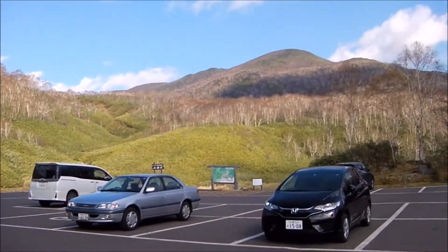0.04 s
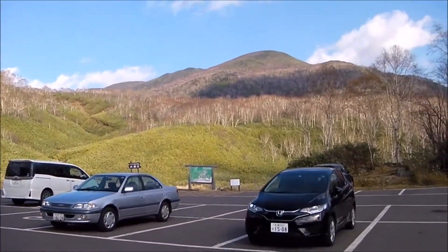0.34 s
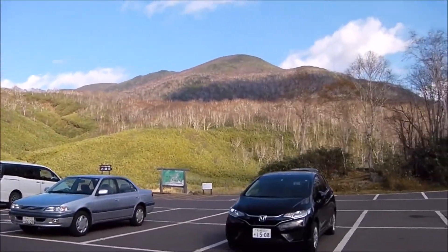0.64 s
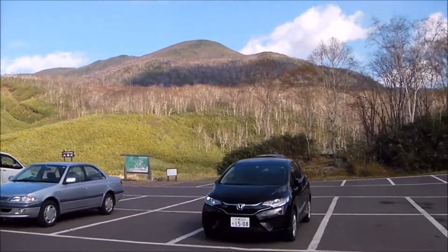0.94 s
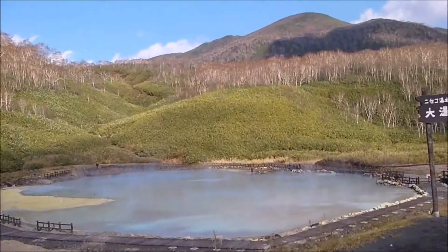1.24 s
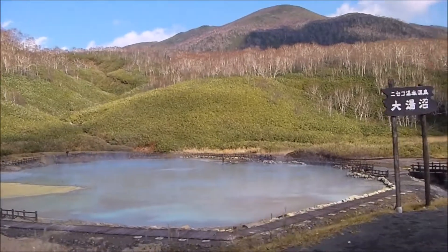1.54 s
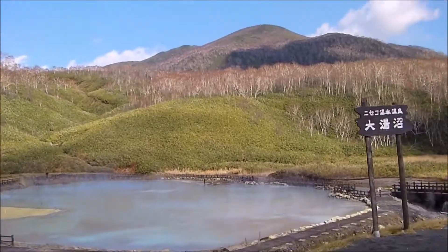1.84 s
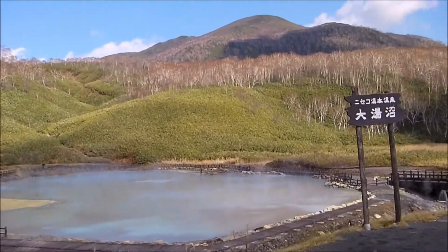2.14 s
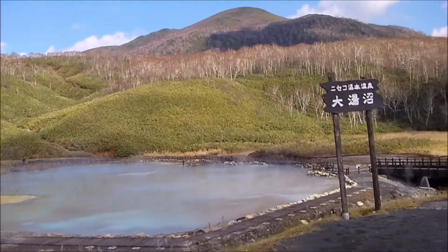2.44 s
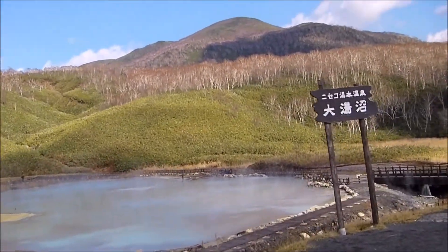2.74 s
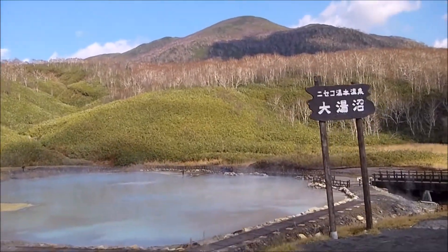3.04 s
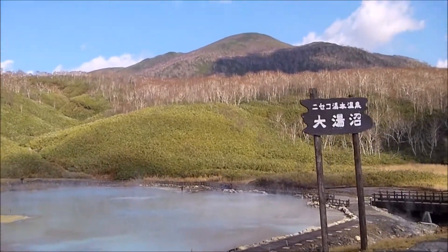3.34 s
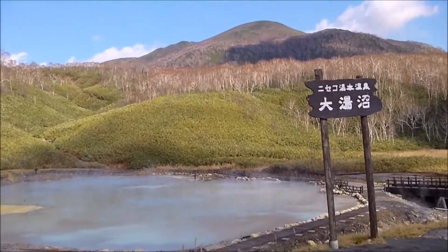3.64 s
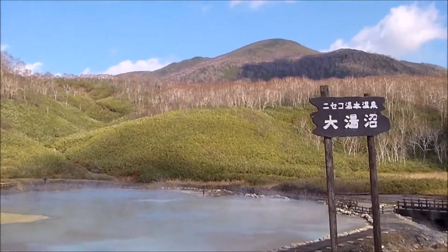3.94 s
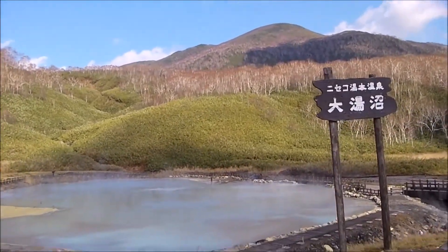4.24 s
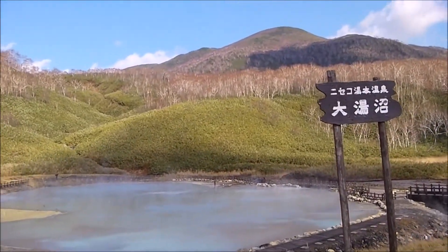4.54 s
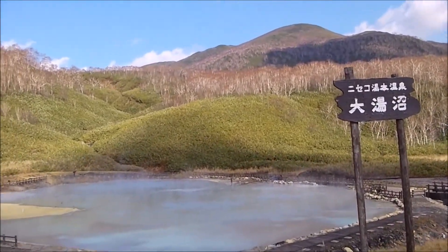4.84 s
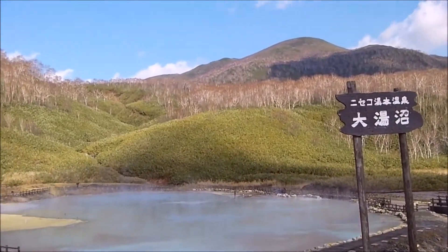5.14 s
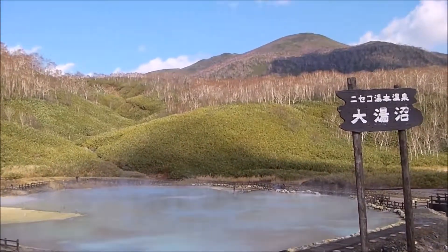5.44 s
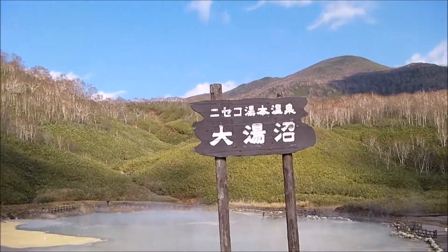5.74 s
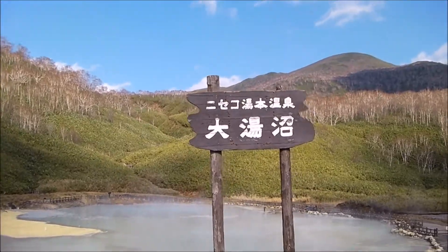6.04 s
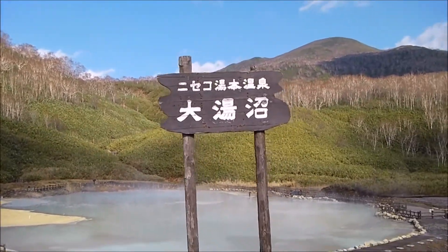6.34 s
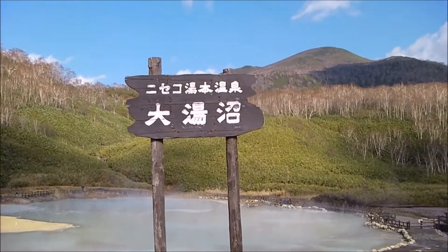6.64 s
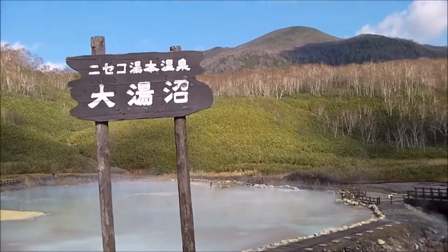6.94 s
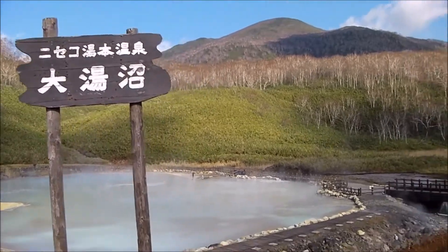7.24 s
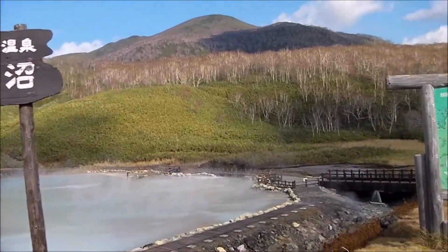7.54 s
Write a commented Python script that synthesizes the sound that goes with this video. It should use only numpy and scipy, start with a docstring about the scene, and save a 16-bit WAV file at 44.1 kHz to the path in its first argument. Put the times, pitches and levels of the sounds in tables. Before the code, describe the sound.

Shoes scrape grit and snap small stones outdoors, while a light breeze, rustling grass and steam hiss quietly behind.

```python
"""Outdoors by a hot spring pond. Wind buffets the microphone over the rush of far vents, rustling dry
grass and hissing steam. Gas bubbles plop faintly and small birds tick and twitter in the distance.
A few steps away, shoes cross gritty asphalt: heels knock, soles scuff and grind the grit, and larger
stones snap underfoot. The whole sound drops out for a moment at 5.5 s."""
import sys
import numpy as np
from scipy import signal
from scipy.fft import rfft, irfft, next_fast_len
from scipy.io import wavfile
from scipy.ndimage import uniform_filter1d

SR = 44100
rng = np.random.default_rng(int(sys.argv[2]) if len(sys.argv) > 2 else 0)


def transcribe(signal):
    """Save signal, clipped to [-1, 1], as a 16-bit WAV file at the path in sys.argv[1]."""
    frames = np.atleast_2d(signal).T
    limited = np.clip(frames, -1, 1)
    pcm = np.round(limited * 32767).astype(np.int16)
    wavfile.write(sys.argv[1], SR, pcm)


N = 343539
TIME = np.arange(N) / SR
FFT_SIZE = next_fast_len(N + SR // 8)
FFT_HZ = np.arange(FFT_SIZE // 2 + 1) * SR / FFT_SIZE
TOP_HZ = 15850


def undb(db):
    """Decibels to gain."""
    return 10 ** (np.asarray(db) / 20)


def unit(x):
    """Scale to rms 1."""
    return x / np.sqrt(np.mean(x ** 2))


def add(track, start_s, sound):
    """Mix a short sound into a track."""
    i = int(start_s * SR)
    track[i:i + len(sound)] += sound[:max(N - i, 0)]


def stereo(mid, side):
    """Left and right from mid and side."""
    return np.array([mid + side, mid - side])


def automation(table):
    """One curve over time for each level column of a table."""
    times, *columns = np.transpose(table)
    return [np.interp(TIME, times, column) for column in columns]


def colour(x, eq):
    """EQ by (frequency [Hz], gain [dB]) points, keeping the power of white noise."""
    hz, db = np.transpose(eq)
    gain = undb(np.interp(np.log(FFT_HZ + 1), np.log(hz), db))
    power = np.mean(undb(np.interp(np.log(np.arange(1, SR / 2)), np.log(hz), db)) ** 2)
    return irfft(rfft(x, FFT_SIZE) * gain, FFT_SIZE)[:N] / np.sqrt(power)


def ring(hz, t60_ms):
    """One struck mode: a decaying sine."""
    t = TIME[:SR // 8]
    return np.sin(2 * np.pi * hz * t) * np.exp(-np.log(1000) * t / (t60_ms / 1000))


def grains(per_s, spread_db, pitches=12):
    """Tiny random impacts, per_s at each pitch, each ringing for a few cycles; rms 1."""
    out = 0
    for hz in np.geomspace(280, 13000, pitches):
        when, size, sign = rng.random((N // 12, 3))[:int(per_s * N / SR)].T
        size_db = spread_db * np.minimum(-np.log(1 - size), 3)  # many small grains, a few large
        hits = np.bincount((when * N).astype(int), np.sign(sign - .5) * undb(size_db), N)
        out = out + signal.lfilter(*signal.iirpeak(hz, Q=3, fs=SR), hits)
    return unit(out)


def flicker(per_s):
    """A smooth random wobble with a spread near 1."""
    hold = int(SR / per_s)
    steps = np.repeat(rng.standard_normal(N // hold + 1), hold)
    return 1.3 * uniform_filter1d(uniform_filter1d(steps, hold), hold)[:N]


def eddies(depth_db):
    """Turbulent noise: each narrow band swells and sinks on its own for a few hundredths of a second."""
    cells = signal.stft(rng.standard_normal(N), nperseg=1024)[2]
    swell = uniform_filter1d(rng.standard_normal(cells.shape), size=4, axis=0)
    swell = unit(uniform_filter1d(swell, size=3, axis=1))
    return unit(signal.istft(cells * undb(depth_db * swell), nperseg=1024)[1][:N])


def flow(eq, flicker_db, flicker_per_s, eddy_db, side_db):
    """Moving air: coloured turbulence with a flickering level and a narrow stereo image."""
    mid = colour(eddies(eddy_db), eq)
    side = undb(side_db) * colour(rng.standard_normal(N), eq)
    return stereo(mid, side) * undb(flicker_db * flicker(flicker_per_s))


# Dull roar of the vents: (frequency [Hz], gain [dB])
VENT_EQ = [(100, -1), (250, -4.5), (400, -0.5), (600, -2), (900, -2.5), (1300, -5), (2500, -44),
           (8000, -50)]
# Its slow swells: (time [s], level [dB])
VENT_LEVELS = [(0, -65), (0.55, -67.5), (1.25, -56.5), (2.25, -56), (2.5, -49), (3.2, -48.5), (3.55, -52.5),
               (4.6, -52), (5.0, -48), (5.48, -47), (5.65, -55), (6.1, -52), (6.5, -48), (6.9, -50.5),
               (7.78, -53.5)]


def vents():
    """Far vents rush in long turbulent surges."""
    level_db, = automation(VENT_LEVELS)
    return flow(VENT_EQ, flicker_db=.5, flicker_per_s=31, eddy_db=2.5, side_db=-24.5) * undb(level_db)


# Breeze faders for wind, grass and steam: (time [s], wind level [dB], grass level [dB], steam level [dB])
BREEZE_LEVELS = [(0, -57.5, -60.5, -62.5), (1.1, -57, -62, -62.5), (1.12, -56, -52.5, -54),
                 (2.5, -56, -50, -52.5), (5.5, -53.5, -49.5, -50.5), (5.6, -56.5, -50.5, -54.5),
                 (6.5, -57.5, -46, -50.5), (7.78, -52.5, -46.5, -50.5)]
# Low wind rumble: (frequency [Hz], gain [dB])
WIND_EQ = [(15, -17), (30, -13.5), (60, 0.5), (90, 1.5), (130, -2.5), (200, -14), (300, -12), (600, -15),
           (2000, -59)]
# Gusts at their height: (time [s], level [dB])
WIND_GUSTS = [(1.15, -52.5), (1.46, -46.5), (1.55, -56), (1.85, -52), (2.42, -47.5), (2.56, -52),
              (2.95, -46), (3.87, -43.5), (4.22, -58), (4.83, -50), (5.3, -48), (5.47, -44), (6.74, -55),
              (7.65, -55)]


def wind(breeze_db, gust_width_s=.042):
    """Wind buffets the microphone: short gusts swell and die on top of the breeze."""
    gust_power = sum(undb(db) ** 2 * np.exp(-((TIME - s) / gust_width_s) ** 2) for s, db in WIND_GUSTS)
    rumble = flow(WIND_EQ, flicker_db=2, flicker_per_s=16, eddy_db=1, side_db=-30.5)
    return rumble * np.sqrt(undb(breeze_db) ** 2 + gust_power)


# Papery upper mids of the grass: (frequency [Hz], gain [dB])
GRASS_EQ = [(400, -43), (900, -10.5), (1400, 0), (2100, 1), (3000, -0.5), (4500, -10), (9000, -30.5),
            (16000, -37)]


def grass(level_db):
    """Dry grass rustles in the breeze and its blades tick against each other."""
    blades = undb(-14) * colour(grains(per_s=120, spread_db=4), GRASS_EQ)
    rustle = flow(GRASS_EQ, flicker_db=1.07, flicker_per_s=21, eddy_db=2.5, side_db=-45)
    return (rustle + blades) * undb(level_db)


# Bright hiss of steam, also used for sprayed dust: (frequency [Hz], gain [dB])
HISS_EQ = [(800, -30), (2000, -23), (3500, 4.5), (5000, 5.5), (7000, 3), (9000, -7.5), (11000, -10.5),
           (16000, -24)]


def steam(level_db):
    """Steam hisses a little to the right; its shortest waves reach the two channels differently."""
    hiss = flow(HISS_EQ, flicker_db=.5, flicker_per_s=14, eddy_db=2.5, side_db=-11)
    sizzle = colour(rng.standard_normal(N), [(3000, -26.5), (8000, 20), (9000, 12.5), (11000, -20)])
    pan_db = np.array([[-1], [1]])
    return (hiss + stereo(0, undb(-17.5) * sizzle)) * undb(level_db + pan_db)


# Thin ticks and a soft twitter: (time [s], length [s], pitch [Hz], level [dB])
BIRD_NOTES = [(0.262, 0.013, 9700, -58), (0.543, .013, 9600, -57), (0.656, 0.016, 9840, -52.5),
              (1.621, 0.043, 9800, -54), (2.206, .022, 9900, -56), (2.797, 0.022, 9700, -56),
              (2.522, .055, 6000, -54), (2.635, 0.084, 5600, -52.5), (2.791, 0.066, 5860, -56.5),
              (5.832, .03, 6670, -54), (7.695, 0.044, 1570, -45.5)]


def birds(width_to_pitch=.13):
    """Short far notes, blurred by scattering in the grass into narrow bands of noise."""
    out = np.zeros(N)
    for s, length_s, hz, db in BIRD_NOTES:
        count = int(length_s * SR)
        narrow = signal.iirpeak(hz, 1 / width_to_pitch, fs=SR)
        note = signal.lfilter(*narrow, signal.lfilter(*narrow, rng.standard_normal(count)))
        add(out, s, undb(db) * unit(np.hanning(count) * note))
    return out


# Faint plops from the pond: (time [s], level [dB], pitch [Hz])
PLOPS = [(0.035, -47, 770), (0.09, -49, 796), (0.967, -45, 785), (1.063, -47, 805), (1.212, -44, 754),
         (1.243, -43, 714), (1.452, -44, 746)]


def bubbles():
    """Gas bubbles burst, each with a brief ring at one pitch."""
    out = np.zeros(N)
    for s, db, hz in PLOPS:
        add(out, s, undb(db) * ring(hz, t60_ms=35))
    return out


# Body of a heel knock: (frequency [Hz], gain [dB], decay by 60 dB [ms])
KNOCK_MODES = [(230, -11, 52), (359, 1, 20), (426, -14, 57)]
# Soft heel falls: (time [s], level [dB])
HEEL_FALLS = [(0.189, -36.5), (0.713, -42.5), (1.853, -36.5), (2.856, -29.5), (6.554, -36), (7.117, -37),
              (7.736, -33)]


def heels():
    """A rubber heel lands with a short dull knock."""
    out = np.zeros(N)
    knock = sum(undb(db) * ring(hz, t60_ms) for hz, db, t60_ms in KNOCK_MODES)
    for s, db in HEEL_FALLS:
        add(out, s, undb(db) * knock)
    return out


# Crackle of the finest grit: (frequency [Hz], gain [dB])
GRIND_EQ = [(700, -49), (1300, 4), (2000, 1), (2800, -25), (4400, -5), (6500, -25)]
# A foot shifts its weight: (time [s], length [s], loudest tick [dB], grinding level [dB])
FOOT_SHIFTS = [(0.2, 0.67, -41, -78), (3.971, 0.29, -34, -69), (7.301, .44, -25, -46.5)]


def grinding():
    """A shifting foot rubs the finest grit into a soft crackle."""
    weight = np.zeros(N)
    for s, length_s, _, db in FOOT_SHIFTS:
        add(weight, s, undb(db) * np.hanning(int(length_s * SR)) ** .5)
    return weight * unit(colour(grains(per_s=220, spread_db=2.5, pitches=8), GRIND_EQ))


def small_stones(per_s=22, range_db=5, centre_hz=2300, spread_octaves=.7, crack_db=-4.5):
    """Stones caught at random by a shifting foot, as extra rows for stones()."""
    rows = []
    for s, length_s, loudest_db, _ in FOOT_SHIFTS:
        for when, softness, pitch in rng.random((64, 3))[:int(per_s * length_s)]:
            hz = centre_hz * 2 ** (spread_octaves * (2 * pitch - 1))
            rows.append((s + when * length_s, loudest_db - softness * range_db, hz, crack_db))
    return rows


def pressure(slide_s, swell_db, attack_s, release_s=.0043):
    """The weight of a shoe comes on, swells or eases during the slide and dies away."""
    t = TIME[:SR // 2]
    swell = undb(swell_db * (np.minimum(t / slide_s, 1) - .5))
    return np.minimum(t / attack_s, 1) * swell * np.exp(-np.maximum(t - slide_s, 0) / release_s)


# Crisp crunch of grit: (frequency [Hz], gain [dB])
GRIT_EQ = [(100, -20), (400, -4), (900, -7.5), (1500, 1), (3000, 0), (4500, -3), (7000, -10),
           (10000, -13.5), (16000, -30)]
# Darker rasp of the sole: (frequency [Hz], gain [dB])
SOLE_EQ = [(60, -19), (180, -4), (330, 1.5), (560, -0.5), (850, -5), (1250, -1), (1750, -9.5), (3000, -8),
           (3700, -11.5), (4600, -33), (9000, -30)]
# Sliding steps: (time [s], slide length [s], grit level [dB], sole level [dB], swell over the slide [dB])
SLIDES = [(0.735, 0.13, -61.5, -62, 0), (2.299, .033, -36, -30, -1.5), (2.852, 0.075, -48, -45.5, 1),
          (3.376, .038, -40.5, -50, 5), (3.793, 0.079, -44.5, -48, -3), (3.98, .016, -47, -62, 0),
          (4.247, .09, -50.5, -55.5, -4), (4.71, 0.025, -37, -34, 2), (5.676, .028, -47, -55, 2),
          (6.534, 0.097, -39, -45, -9), (7.102, .17, -45, -54, 0), (7.735, .06, -44, -49, -1)]


def scuffs(grit_attack_s=.003, sole_attack_s=.0086):
    """A sliding shoe crushes the grit first; then the weight comes on and the sole itself rasps."""
    grit, sole = np.zeros(N), np.zeros(N)
    for s, slide_s, grit_db, sole_db, swell_db in SLIDES:
        crushing = pressure(slide_s, swell_db, grit_attack_s)
        # loosened grit rolls on after the slide
        rolling = undb(-10) * pressure(slide_s, swell_db, grit_attack_s, release_s=.042)
        add(grit, s, undb(grit_db) * np.maximum(crushing, rolling))
        add(sole, s, undb(sole_db) * pressure(slide_s, swell_db, sole_attack_s))
    crunch = colour(grit * grains(per_s=900, spread_db=4.5), GRIT_EQ)
    rasp = colour(sole * grains(per_s=1200, spread_db=0), SOLE_EQ)
    dust = colour(grit * rng.standard_normal(N), HISS_EQ)  # a fine spray that adds width
    return stereo(crunch + rasp, undb(-27.5) * dust)


# Larger stones snapping under a sole: (time [s], level [dB], pitch [Hz], crack relative to ring [dB])
STONE_SNAPS = [(0.352, -35, 2100, -7), (0.748, -27, 3000, -4), (0.867, -31.5, 1900, -21),
               (1.164, -31, 3000, 4), (1.294, -34, 9100, -1), (1.5457, -26.5, 2080, -26),
               (1.895, -20, 3820, -17), (1.9057, -27, 3280, -9), (2.347, -23, 3100, -11),
               (2.4887, -23.5, 1950, -18), (2.8708, -21.5, 1940, -11), (2.9212, -23.5, 3670, -36),
               (3.375, -27, 6500, -2), (3.8103, -17, 2580, -13), (3.8506, -18, 2080, -3),
               (3.9794, -20.5, 1930, -5), (3.994, -22.5, 2620, -16), (3.9966, -24.5, 9800, -4),
               (4.1032, -24, 9680, -1), (4.207, -32.5, 8060, -10), (4.7267, -16.5, 2140, -23),
               (4.738, -7.5, 1590, -42), (4.748, -17, 1910, -12), (5.678, -28, 2000, -15),
               (6.597, -23, 2500, -13), (7.274, -20.5, 2100, -6), (7.296, -21.5, 1750, -6),
               (7.336, -23, 1780, -19), (7.5728, -17, 1910, -3.5), (7.6616, -20, 1830, 7)]


def stones(crack_ms=.9, tail_ms=8, overtone_ratio=1.6, muffle_hz=11800):
    """Each stone rings for a few cycles; a sharper snap adds an overtone, a crack and a spray of dust."""
    mid, side = np.zeros(N), np.zeros(N)
    t_ms = 1000 * TIME[:SR // 8]
    burst = np.exp(-t_ms / crack_ms) + undb(-21) * np.exp(-t_ms / tail_ms)
    for s, db, hz, crack_db in STONE_SNAPS + small_stones():
        # smaller stones ring higher, crack brighter and die sooner
        band = signal.butter(2, [.7 * hz, min(2.9 * hz, TOP_HZ)], "band", fs=SR, output="sos")
        crack, dust = signal.sosfilt(band, rng.standard_normal((2, len(t_ms))) * burst)
        t60_ms = 5.5 * np.sqrt(2000 / hz)
        body = ring(hz, t60_ms) + undb(crack_db - 5) * ring(hz * overtone_ratio, t60_ms / 2)
        # so small a body radiates no bass
        body = signal.sosfilt(signal.butter(2, hz / 4, "high", fs=SR, output="sos"), body)
        snap = body + 2 * undb(crack_db) * crack
        gain = undb(db) / np.abs(snap).max()
        add(mid, s, gain * snap)
        add(side, s, gain * 2 * undb(crack_db - 13) * dust)
    # the sole covers the stone and muffles the very top
    return signal.sosfilt(signal.butter(3, muffle_hz, fs=SR, output="sos"), stereo(mid, side))


def scene():
    """Footsteps over a bed of moving air, in the open with no walls to echo."""
    wind_db, grass_db, steam_db = automation(BREEZE_LEVELS)
    bed = wind(wind_db) + vents() + grass(grass_db) + steam(steam_db)
    footsteps = scuffs() + grinding() + stones() + heels()
    return bed + birds() + bubbles() + footsteps


# Stretches where the image leans left: (start [s], end [s])
LEFT_LEANS = [(3.34, 4.67), (6.61, 7.9)]


def lean_left(sound, centre_hz=584, smear_s=.013):
    """The low mids shift to the left while a short diffuse smear widens the image."""
    gate = sum(1. * ((TIME > start) & (TIME < end)) for start, end in LEFT_LEANS)
    mid = sound.mean(axis=0)
    shift = undb(-9) * signal.lfilter(*signal.iirpeak(centre_hz, Q=.45, fs=SR), mid)
    tail = rng.standard_normal(SR // 16) * np.exp(-TIME[:SR // 16] / smear_s)
    tail = signal.lfilter(*signal.butter(1, [200, 1600], "band", fs=SR), tail / np.linalg.norm(tail))
    smear = undb(-15) * signal.oaconvolve(mid, tail)[:N]
    return sound + stereo(0, uniform_filter1d(gate, size=1500) * (shift + smear))


# Resonances and notches of the microphone housing: (frequency [Hz], width [Hz], gain [dB])
HOUSING_EQ = [(280.6, 96, -7.5), (402, 107, 4), (7870, 220, -16.5), (8630, 1600, 9), (9770, 340, -6.5),
              (15300, 250, 1)]
# A brief dip to near silence: (time [s], gain [dB])
DROPOUT = [(5.497, 0), (5.5, -24), (5.535, -65), (5.56, -65), (5.596, -2), (5.61, 0)]


def record(dry, hiss_db=-61):
    """The housing colours the sound, the image leans, the amplifier hisses, the level dips briefly."""
    housing_db = sum(db * .5 ** ((2 * (FFT_HZ - hz) / width) ** 2) for hz, width, db in HOUSING_EQ)
    sound = irfft(rfft(dry, FFT_SIZE) * undb(housing_db), FFT_SIZE)[:, :N]
    hiss = undb(hiss_db) * stereo(rng.standard_normal(N), rng.standard_normal(N))
    dropout_db, = automation(DROPOUT)
    sound = (lean_left(sound) + hiss) * undb(dropout_db)
    high_cut = signal.ellip(10, .2, 70, TOP_HZ, fs=SR, output="sos")
    return signal.sosfilt(high_cut, sound)


dry = scene()
out = record(dry)
transcribe(out)
```